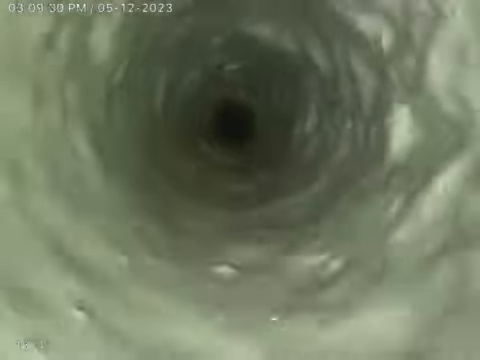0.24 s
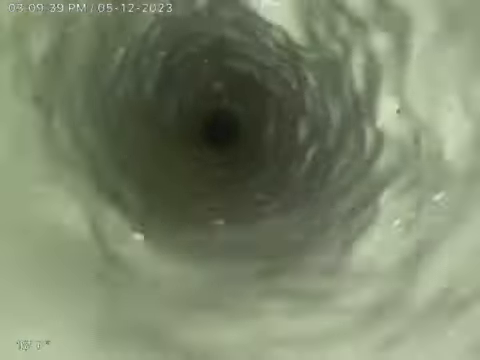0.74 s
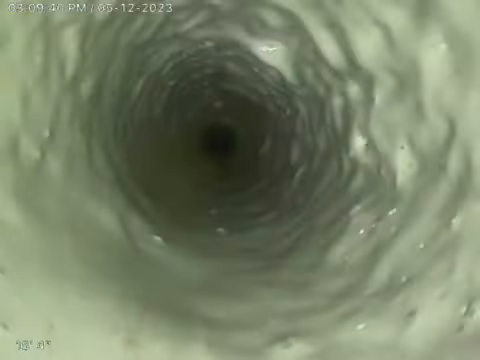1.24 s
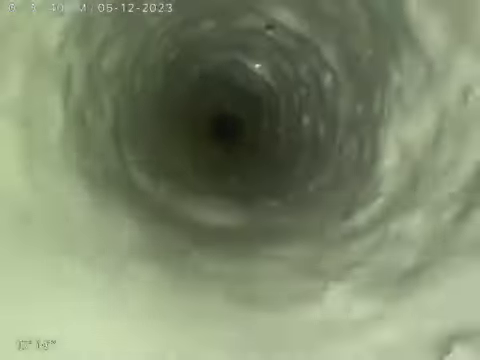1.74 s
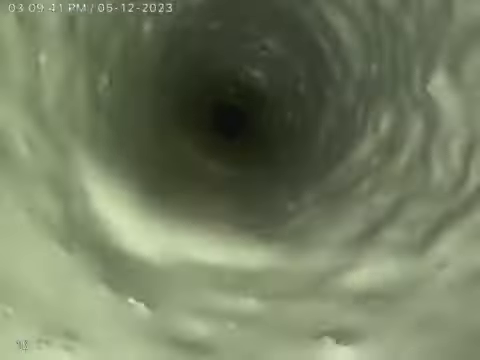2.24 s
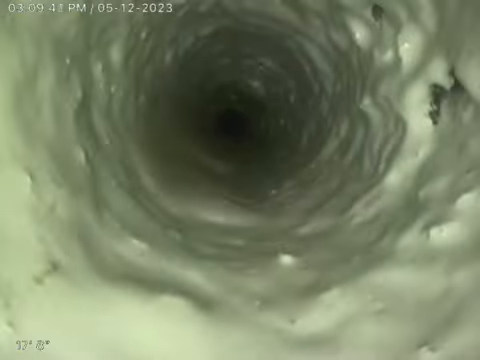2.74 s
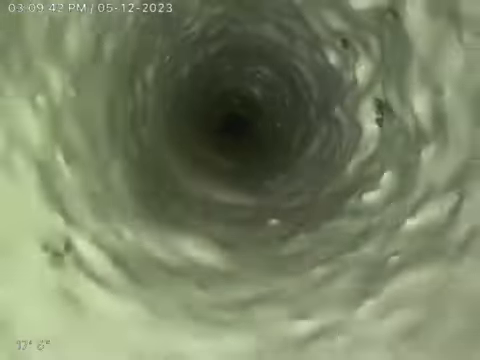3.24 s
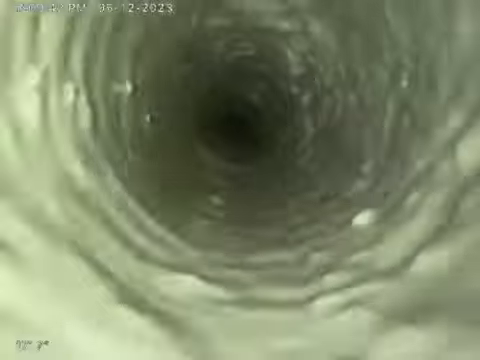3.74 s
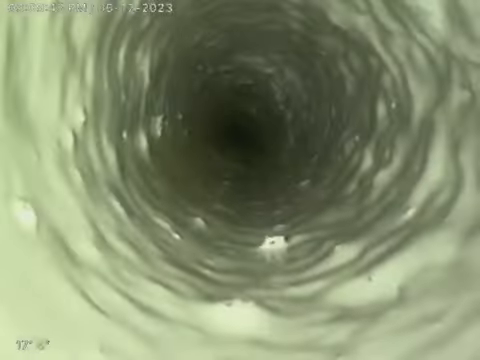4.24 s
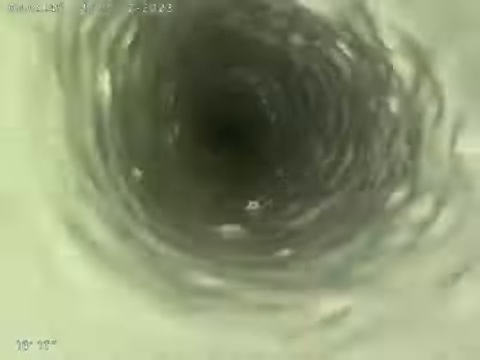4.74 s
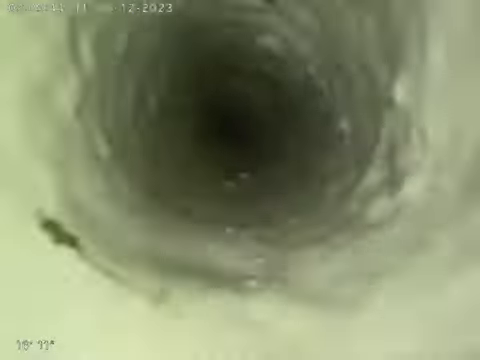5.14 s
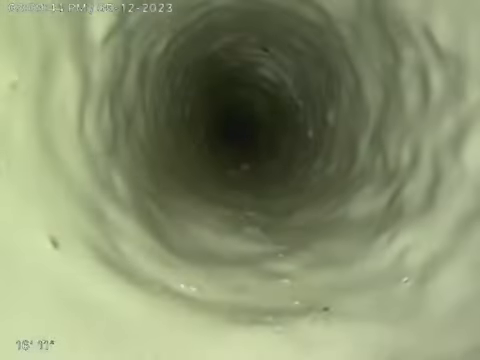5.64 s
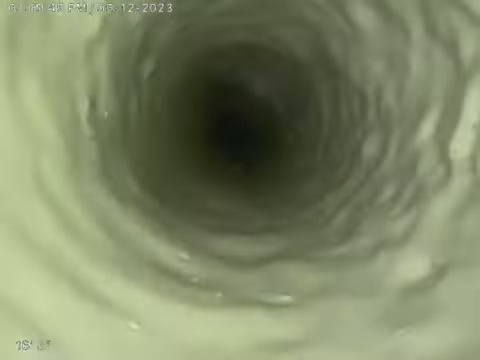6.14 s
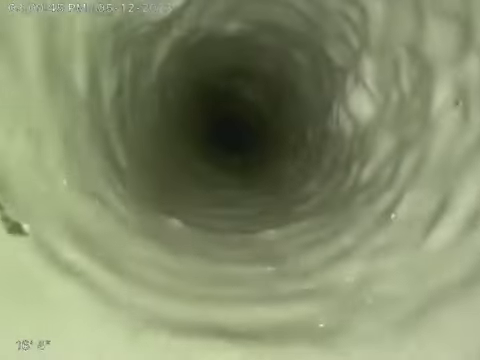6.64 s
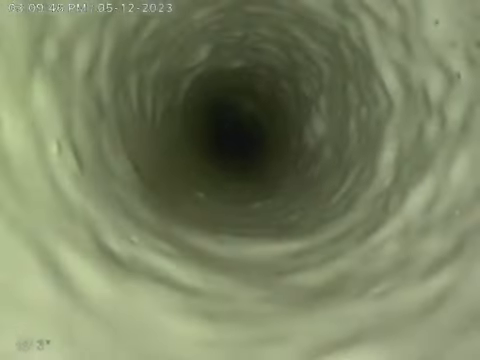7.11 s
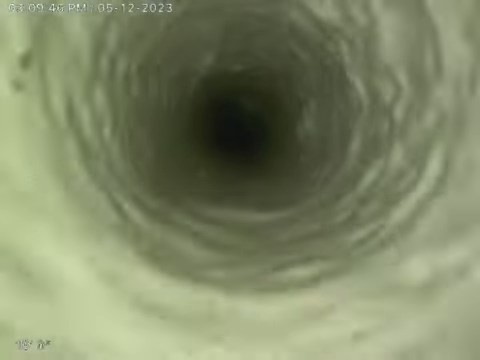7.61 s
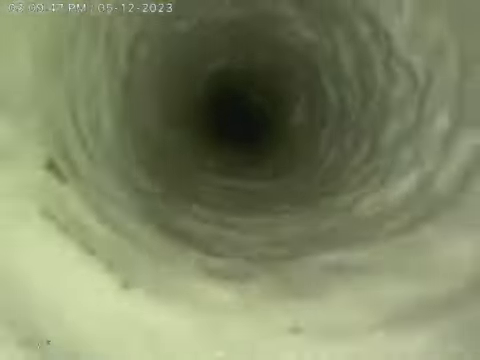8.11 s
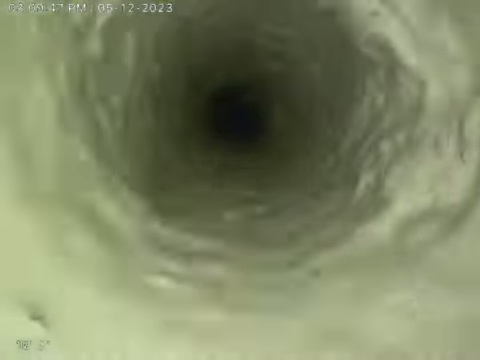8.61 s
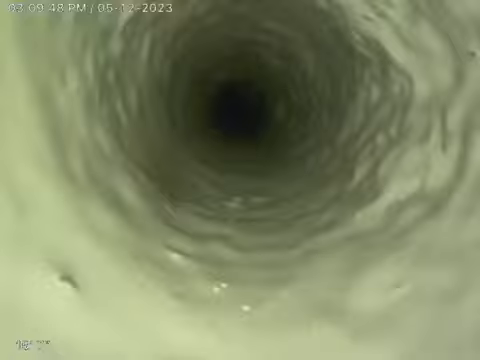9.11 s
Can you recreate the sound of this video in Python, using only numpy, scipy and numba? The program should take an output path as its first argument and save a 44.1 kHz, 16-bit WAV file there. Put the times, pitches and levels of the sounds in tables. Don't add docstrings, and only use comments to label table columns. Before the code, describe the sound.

A stiff cable is dragged in jerks through a hollow drain pipe, slapping, ticking and thumping over a faint low machine hum.

```python
import sys
import numpy as np
from scipy import signal
from scipy.io import wavfile
from scipy.ndimage import uniform_filter1d
from numba import njit

SR = 44100
rng = np.random.default_rng(int(sys.argv[2]) if len(sys.argv) > 2 else 0)


def materialize(psi):
    bounded = np.clip(np.atleast_2d(psi).T, -1, 1)
    quanta = np.round(bounded * 32767).astype(np.int16)
    wavfile.write(sys.argv[1], SR, quanta)


def magnitude_from_level(level_db):
    exponent = np.asarray(level_db, float) / 20
    return 10 ** exponent


N = 413216

# pitch_hz, density_db_per_hz
AIR_SPECTRUM = [(24, -29.5), (40, -8.5), (133, -4.5), (184, -15.5), (613, -32), (1680, -32), (2320, -41),
                (2880, -21.5), (3210, -36), (3650, -41), (6800, -42), (8840, -85.5), (15000, -120)]
AIR_DB = -49.5
# pitch_hz, width_hz, level_db
HUM_LINES = [(58.2, 5.5, -52), (72, 19, -55), (119.8, 8.8, -57), (1767, 380, -63.5), (2066, 49, -69.5),
             (3587, 38, -66.5), (3780, 92, -77)]

# start_s, end_s, boom_db, scrape_re_boom_db, slowing_db_per_s
PULLS = [(0.078, 0.175, -48.5, 1.5, 37.5), (0.912, 1.29, -38, -5, 115), (1.485, 1.646, -44.5, -6, 39.5),
         (2.525, 2.59, -38, -7, 44), (3.096, 3.113, -47.5, -7, 55), (3.997, 4.176, -36, -9, 46),
         (5.58, 5.806, -36.5, -7.5, 28.5), (7.284, 7.442, -36.5, -7.5, 27.5),
         (7.655, 7.86, -43.5, -6.5, 108), (8.804, 8.963, -37.5, -6.5, 37.5),
         (9.322, 9.372, -54.5, 10.5, 50)]
SPEED_UP_DB_PER_S = 59
CREEP_BOOM_DB, CREEP_SCRAPE_DB = -57, -58
# pitch_hz, width_hz, level_db
PIPE_MODES = [(74, 24, -6.5), (190, 35.5, -2.5), (235, 31.4, 0.5), (316.4, 50.3, -2.5), (443, 141, -6.5),
              (533, 166, -8.5)]
# pitch_hz, density_db_per_hz
SCRAPE_SPECTRUM = [(290, -24), (500, 1.5), (733, -5.5), (817, 5.5), (2440, -5.5), (2810, -3), (4070, -9.5),
                   (6800, -18.5), (8840, -66.5), (15000, -120)]

# start_s, peak_db, edge_re_peak_db, ring_hz, rattle_ms
SLAPS = [(0.097, -14.5, -12.5, 1120, 13), (0.183, -22.5, -26, 940, 4.4), (0.4, -19.5, -3, 1850, 6.9),
         (1.21, -24, -37, 1000, 9.6), (1.57, -10.5, -8, 1110, 7.4), (2.028, -16.5, -2.5, 2500, 7.7),
         (2.476, -11.5, -26, 1120, 6), (2.741, -22.5, -14.5, 1660, 5.6), (2.944, -23.5, -35, 940, 5.4),
         (3.056, -19.5, -7, 995, 10.3), (3.636, -15.5, -4.5, 1870, 8.4), (4.364, -22.5, -38, 1340, 6.4),
         (4.499, -26.5, 5, 2180, 8.2), (4.522, -11.5, -7, 1400, 8), (6.081, -21.5, -26, 1200, 7.6),
         (7.034, -23.5, -5, 3080, 4.3), (7.295, -16.5, -9.5, 1110, 5.4), (7.519, -23, -12, 830, 7),
         (7.628, -16.5, -16.5, 970, 8.1), (7.705, -23, -12, 990, 5.3), (8.025, -21, -3.5, 1600, 3),
         (8.669, -27, 0, 890, 5.6), (8.792, -13, -17.5, 1300, 5.2), (9.318, -15.5, -18, 2660, 7.3)]
SLAP_BODY_DB = -13
# start_s, peak_db, ring_hz, rattle_ms
TAPS = [(0.223, -28.5, 1550, 5.9), (0.296, -32, 2800, 4), (0.856, -27.5, 1910, 5.6), (1.27, -30.5, 790, 5),
        (1.417, -27, 1550, 7.7), (1.464, -25.5, 1940, 6.0), (1.694, -29, 1540, 7.3),
        (1.772, -27, 1540, 1.4), (1.994, -34, 2580, 6.2), (2.42, -26.5, 2700, 4.8),
        (2.873, -28.5, 1900, 7.4), (4.01, -25.5, 2640, 5), (4.086, -32, 2700, 3.4), (4.657, -30, 1140, 3.6),
        (4.671, -26.5, 1250, 7.1), (5.505, -25, 1960, 5.5), (5.881, -23.5, 1680, 3.2),
        (6.042, -34.5, 2030, 7.3), (6.166, -26, 2730, 3.9), (6.484, -34, 2800, 4.7),
        (6.619, -32, 1530, 3.6), (7.329, -29, 2620, 12), (7.542, -26, 2480, 4.3), (7.886, -31, 2100, 1.6),
        (8.876, -26, 1200, 7.3), (9.121, -27, 2650, 5.6), (9.294, -26.5, 1580, 11)]
TAP_BODY_DB, TAP_EDGE_DB = -12.5, -12.5
BRIGHT_DB_PER_OCT = 2.5
# start_s, peak_db, ring_hz
TICKS = [(0.518, -35, 2620), (0.637, -32.5, 2690), (0.736, -40, 2580), (1.361, -34, 1760),
         (1.543, -36.5, 2830), (2.174, -41, 2700), (2.266, -36.5, 1680), (3.944, -37.5, 2630),
         (4.792, -31.5, 820), (4.969, -42, 960), (5.226, -45, 1700), (6.299, -33.5, 1220),
         (6.765, -38, 2830), (6.877, -40, 925), (6.91, -37, 2720), (7.592, -34, 2120), (7.816, -36, 1500),
         (7.926, -34, 950), (8.043, -36.5, 1500), (8.142, -42, 1800), (8.172, -41, 1930), (8.23, -41, 2860),
         (8.368, -33.5, 1490), (8.459, -36.5, 2140), (8.557, -41.5, 840)]
TICK_BODY_DB, TICK_EDGE_DB, TICK_MS = -13, -10.5, 3.8
# start_s, peak_db, body_re_peak_db, rattle_ms
KNOCKS = [(0.921, -34, -2, 8.5), (0.943, -27.5, -6, 8.2), (1.289, -32, -4, 5.1), (2.52, -27.5, 5.5, 6.3),
          (2.629, -35, -8, 5.2), (2.998, -41, 7, 3.2), (3.15, -39, 19.5, 4.1), (4.063, -29.5, -4.5, 4.7),
          (5.359, -41, 6, 4.1), (5.389, -29, -9, 4.2), (5.847, -37, 8, 3.7), (5.981, -45, 11, 3.7),
          (6.017, -33, -3, 9), (7.148, -29.5, -2, 5), (7.495, -32, 2, 1.5), (7.84, -37, 0.6, 7.3),
          (9.075, -25.5, -2, 10.1), (9.096, -22.5, 4.5, 4.5), (9.247, -31, 1.5, 5.4), (9.259, -30, -9, 9.9)]
KNOCK_EDGE_DB, KNOCK_HZ = -14, 870
# pitch_hz, width_hz, level_db
WALL_MODES = [(815, 140, 4), (1200, 685, 2.5), (1550, 480, 4), (1850, 180, 3.5), (2804, 257, 2.5)]
NEAR_DB_PER_OCT = 3
# pitch_hz, width_hz, level_db
EDGE_MODES = [(3440, 1510, 1), (4600, 2050, 0), (4914, 220, 4), (5400, 4200, -20)]

# start_s, peak_db, pitch_hz, rise_ms
THUMPS = [(0.112, -21, 335, 6.6), (0.242, -24, 220, 4.5), (0.403, -30, 216, 9), (0.983, -24, 177, 5.9),
          (1.084, -27.5, 195, 10.5), (1.127, -23, 228, 8), (1.57, -22, 224, 7.3), (2.03, -28.5, 446, 3.7),
          (2.483, -8.5, 216.7, 7.6), (2.521, -22.5, 247, 12), (2.946, -31.5, 343, 5.3),
          (3.058, -28.5, 347, 8), (3.155, -25, 190, 7.1), (3.639, -28, 240, 6.9), (3.945, -28, 203, 12),
          (4.189, -34, 203, 6), (4.364, -33, 334, 12), (4.521, -31.5, 258, 5), (5.625, -30, 235, 12),
          (6.074, -30.5, 232, 16), (7.306, -24, 345, 5.9), (7.624, -27, 190, 10.6), (7.697, -27, 365, 13),
          (7.822, -24.5, 251, 17), (8.796, -10, 299, 8.2), (9.052, -23, 229.5, 17), (9.105, -15, 216, 5.6),
          (9.245, -29.5, 296, 24), (9.317, -24, 312, 7.6)]
# start_s, peak_db, pitch_hz
MORE_THUMPS = [(0.492, -37.5, 260), (1.361, -37, 288), (1.466, -38.5, 338), (1.802, -37.5, 213),
               (2.741, -33.5, 245), (3.442, -38, 230), (3.822, -36.5, 194), (4.108, -35.5, 205),
               (4.599, -34, 330), (4.65, -32, 322), (5.372, -35, 390), (6.291, -39.5, 296), (7.124, -33.5, 282),
               (7.423, -48, 294), (7.941, -36, 238), (8.38, -40, 149), (8.611, -35.5, 211)]
MORE_THUMP_MS = 5.2

ROOM_T60_S, ROOM_DULL_HZ, ROOM_DB = 0.28, 4930, -14

# low_hz, high_hz, share_of_time
HOLES = [(3230, 3350, .08), (4030, 4200, .4), (4700, 4850, .06), (5420, 5600, .3), (5600, 5900, .2),
         (6150, 6350, .12)]
# start_s, end_s
PATCHY = [
    (0.09, 0.14),
    (0.34, 0.46),
    (0.6, 0.65),
    (2.0, 2.07),
    (2.43, 2.5),
    (6.1, 6.23),
    (7.25, 7.3),
    (8.05, 8.1),
    (8.7, 8.79),
    (9.24, 9.28),
]
PATCH_HZ, PATCH_SHARE = 330, .25
# start_s, end_s
TOP_LOST = [
    (6.62, 6.66),
    (8.023, 8.08),
]
TOP_HZ = 6800


def level(x, db):
    return x * magnitude_from_level(db) / np.sqrt(np.mean(x ** 2))


def top(x, db):
    return x * magnitude_from_level(db) / np.abs(x).max()


@njit
def svf(x, hz, width):
    y, band, low = np.empty(len(x)), 0., 0.
    g, k = np.tan(np.pi * hz / SR), width / hz
    for i in range(len(x)):
        v = (band + g * (x[i] - low)) / (1 + g * (g + k))
        band, low, y[i] = 2 * v - band, low + 2 * g * v, k * v
    return y


def svf_twice(x, hz, width):
    return svf(svf(x, hz, width), hz, width)


def ring(x, modes, detune=1.):
    out = 0
    for k, (hz, width, db) in enumerate(modes):
        out = out + (-1) ** k * magnitude_from_level(db) * svf(x, detune * hz, 1. * width)
    return out


def walk(rate):
    hold = int(SR / rate)
    steps = np.repeat(rng.standard_normal(N // hold + 1), hold)
    w = uniform_filter1d(uniform_filter1d(steps, hold), hold)[:N]
    return w / w.std()


def grit(count, rate, spread_db):
    touch = rng.random(count) < rate / SR
    return touch * rng.standard_normal(count) * magnitude_from_level(spread_db * rng.exponential(size=count))


def bands(spectrum, flicker_db, rate, source):
    hz, db = np.transpose(spectrum)
    out = 0
    for f in hz[0] * 2 ** np.arange(0, np.log2(8000 / hz[0]), 1 / 3):
        band = svf_twice(source(), f, f / 3)
        band_db = np.interp(np.log(f), np.log(hz), db) + flicker_db * walk(rate)
        out = out + magnitude_from_level(band_db) * band
    return out


def swell(t, tau, soft=0.93):
    return (t / tau * np.exp(1 - t / tau)) ** soft


def background():
    out = level(bands(AIR_SPECTRUM, 1., 7.1, lambda: rng.standard_normal(N)), AIR_DB)
    for hz, width, db in HUM_LINES:
        out = out + level(svf_twice(rng.standard_normal(N), 1. * hz, 1. * width), db)
    return out


def hauling():
    t = np.arange(N) / SR
    boom, scrape = magnitude_from_level(2 * CREEP_BOOM_DB), magnitude_from_level(2 * CREEP_SCRAPE_DB)
    for start, end, db, scrape_db, slowing in PULLS:
        before, after = np.maximum(start - t, 0), np.maximum(t - end, 0)
        power = magnitude_from_level(2 * (db - SPEED_UP_DB_PER_S * before - slowing * after))
        boom = boom + power
        scrape = scrape + power * magnitude_from_level(2 * scrape_db)
    return np.sqrt(boom), np.sqrt(scrape)


def drag():
    boom_gain, scrape_gain = hauling()
    jerks = magnitude_from_level(2.05 * walk(45))
    boom = ring(grit(N, rate=1500, spread_db=2.0) * jerks, PIPE_MODES)
    pressure = jerks ** 0.4 * magnitude_from_level(1.6 * walk(120))
    scrape = bands(SCRAPE_SPECTRUM, 1.6, 30, lambda: pressure * grit(N, rate=12000, spread_db=1.))
    return level(boom, 0) * boom_gain + level(scrape, 0) * scrape_gain


def contacts():
    out = []
    for s, db, edge_db, hz, ms in SLAPS:
        out.append((s, db, SLAP_BODY_DB, edge_db, hz, ms))
    for s, db, hz, ms in TAPS:
        edge_db = TAP_EDGE_DB + BRIGHT_DB_PER_OCT * np.log2(hz / 1500)
        out.append((s, db, TAP_BODY_DB, edge_db, hz, ms))
    for s, db, hz in TICKS:
        out.append((s, db, TICK_BODY_DB, TICK_EDGE_DB, hz, TICK_MS))
    for s, db, body_db, ms in KNOCKS:
        out.append((s, db, body_db, KNOCK_EDGE_DB, KNOCK_HZ, ms))
    return out


def slaps():
    out = np.zeros(N + SR)
    t = np.arange(SR // 8) / SR
    dull = signal.butter(3, [620, 3600], "band", fs=SR, output="sos")
    for s, db, body_db, edge_db, hz, ms in contacts():
        tau = max(1.3 * ms - 2.2, .6) / 1000

        def rattle(share):
            return grit(len(t), rate=16000, spread_db=1.) * swell(t, share * tau, soft=1.8)

        detune = 1 + .05 * rng.standard_normal()
        spot = [(f, w, g - NEAR_DB_PER_OCT * abs(np.log2(f / hz))) for f, w, g in WALL_MODES]
        struck = svf(rattle(1.1), 1. * hz, .25 * hz)
        wall = signal.sosfilt(dull, ring(rattle(1.), spot, detune) + magnitude_from_level(1.0) * struck)
        edge = ring(rattle(0.84), EDGE_MODES, detune)
        body = svf_twice(rattle(1.33), 520.0, 470.0)
        at = int(max(s + .0008 - .15 * tau, 0) * SR)
        out[at:at + len(t)] += top(wall, db) + top(edge, db + edge_db) + top(body, db + body_db)
    return out[:N]


def thumps():
    out = np.zeros(N + SR)
    t = np.arange(SR // 5) / SR
    for s, db, hz, ms in [*THUMPS, *[(*bump, MORE_THUMP_MS) for bump in MORE_THUMPS]]:
        shape = swell(t, 0.91 * ms / 1000)
        cycles = hz * t * (1.06 - 2.3 * t) + rng.random()
        note = shape * np.sin(2 * np.pi * cycles)
        modes = ring(rng.standard_normal(len(t)) * shape ** 2, PIPE_MODES[1:])
        at = int(s * SR)
        out[at:at + len(t)] += top(note + top(modes, 2.3), db)
    return out[:N]


def room(x):
    t = np.arange(SR // 2) / SR
    onset = np.clip(t / .008, 0, 1)
    echo = rng.standard_normal(len(t)) * magnitude_from_level(-60 * t / ROOM_T60_S) * onset
    echo = signal.lfilter(*signal.butter(1, ROOM_DULL_HZ, fs=SR), echo)
    return x + magnitude_from_level(ROOM_DB) * signal.fftconvolve(x, echo / np.linalg.norm(echo))[:N]


def scene():
    return (room(slaps() + thumps()) + drag() + background())[None]


def band_of(x, low_hz, high_hz):
    return signal.sosfiltfilt(signal.butter(3, [low_hz, high_hz], "band", fs=SR, output="sos"), x)


def soften(gate):
    return uniform_filter1d(1. * gate, size=400)


def within(spans):
    t = np.arange(N) / SR
    return sum((t > start) & (t < end) for start, end in spans) > 0


def dropouts(x):
    out = x
    for low, high, share in HOLES:
        luck = walk(12)
        out = out - band_of(out, low, high) * soften(luck < np.quantile(luck, share))
    patchy = within(PATCHY)
    for low in np.arange(3300, TOP_HZ, PATCH_HZ):
        luck = walk(45)
        lost = luck < np.quantile(luck, PATCH_SHARE * low / 5000)
        out = out - band_of(out, low, low + PATCH_HZ) * soften(patchy & lost)
    high = signal.sosfiltfilt(signal.butter(10, 5550, "high", fs=SR, output="sos"), out)
    return out - high * soften(within(TOP_LOST))


def top_cut(x):
    return signal.sosfilt(signal.butter(12, 7440, fs=SR, output="sos"), x)


def record(dry):
    mic = signal.sosfilt(signal.butter(3, 42, "high", fs=SR, output="sos"), dry)
    cut = signal.sosfilt(signal.cheby1(14, .3, TOP_HZ, fs=SR, output="sos"), mic)
    mix = dropouts(cut)
    return top_cut(mix)


dry = scene()
out = record(dry)
materialize(out)
```